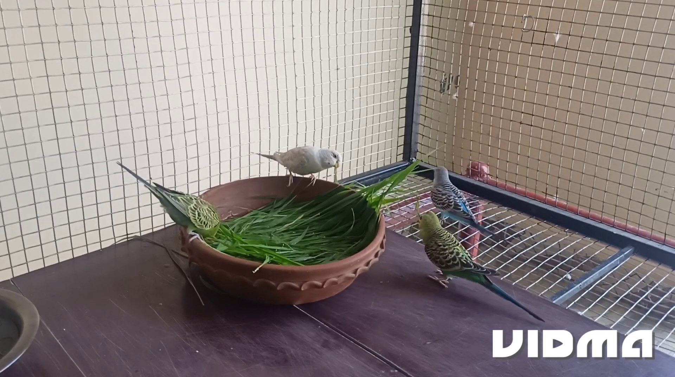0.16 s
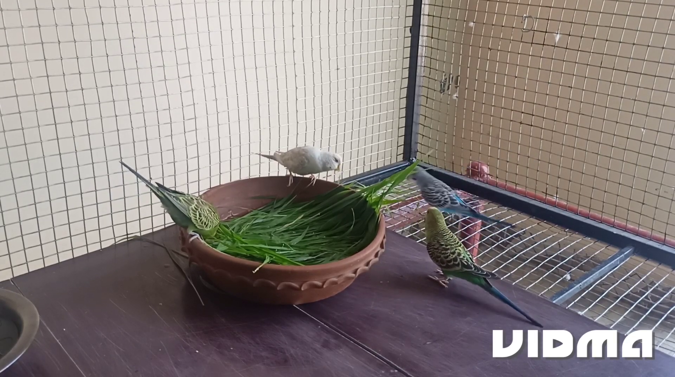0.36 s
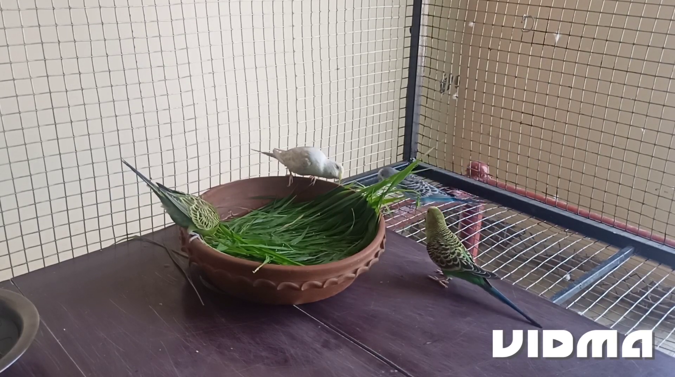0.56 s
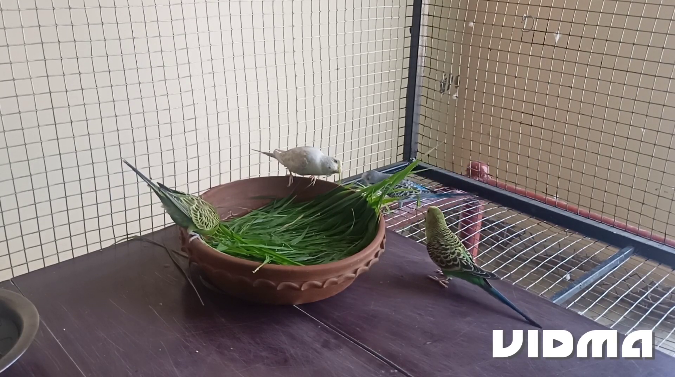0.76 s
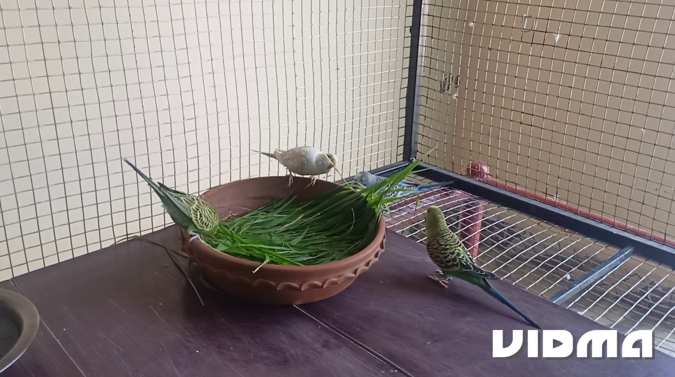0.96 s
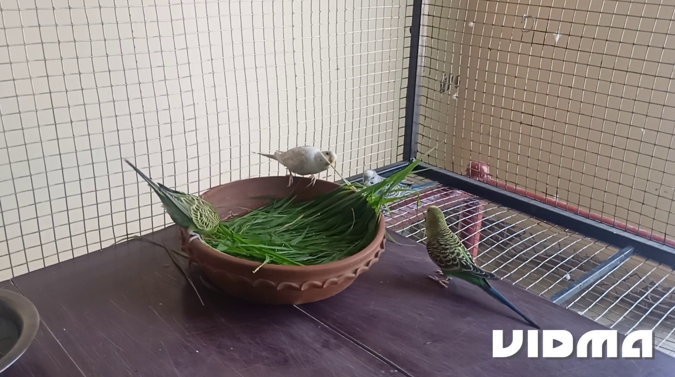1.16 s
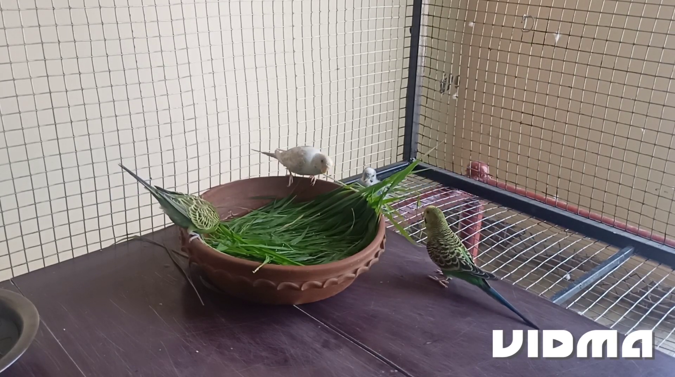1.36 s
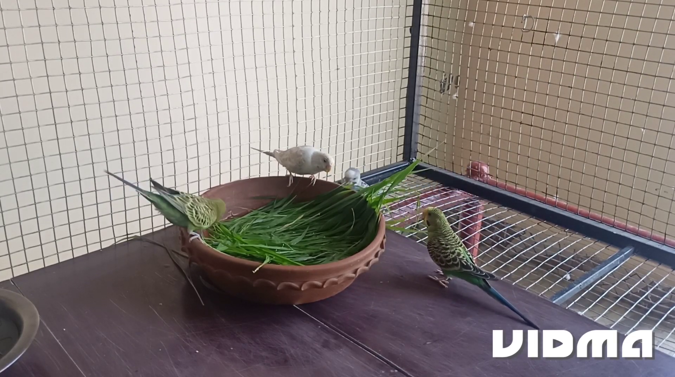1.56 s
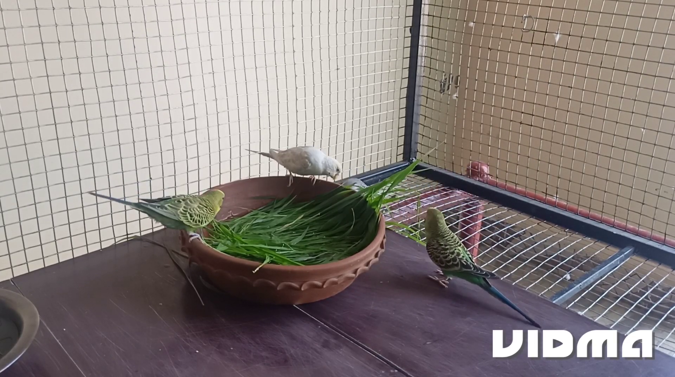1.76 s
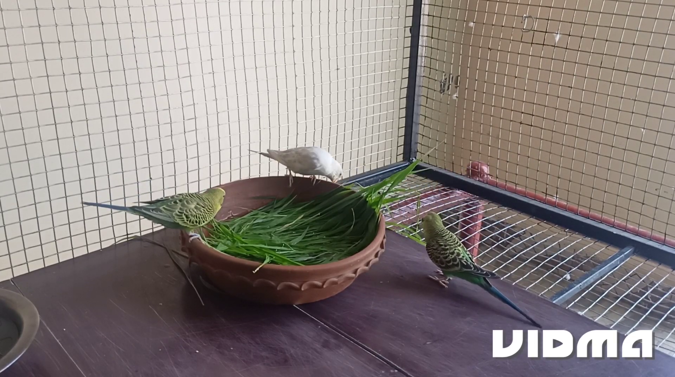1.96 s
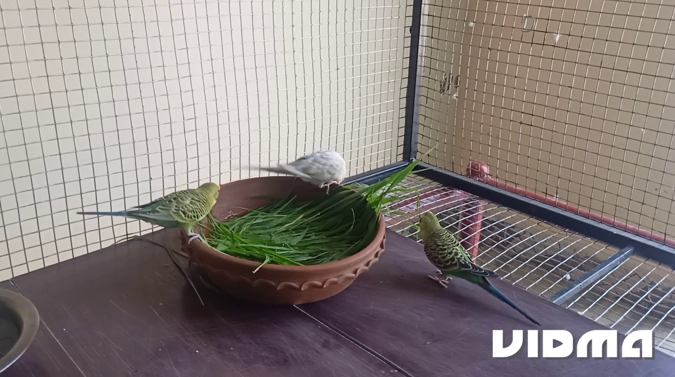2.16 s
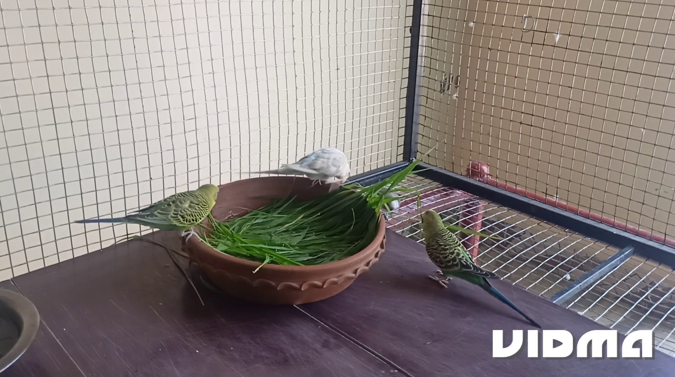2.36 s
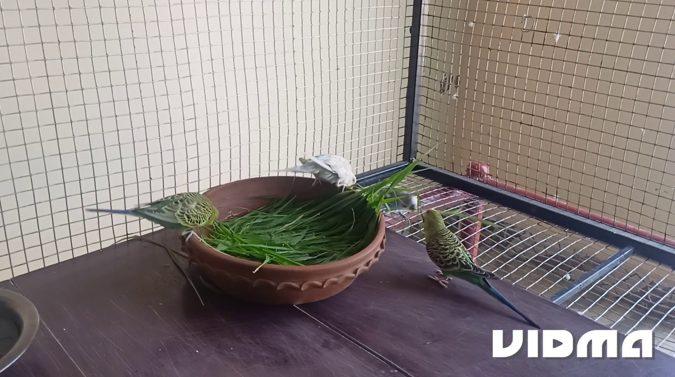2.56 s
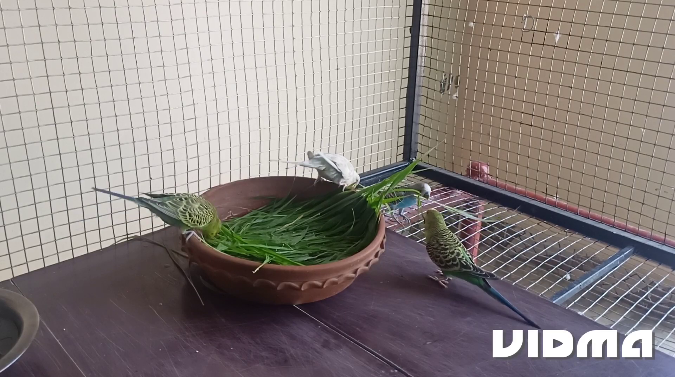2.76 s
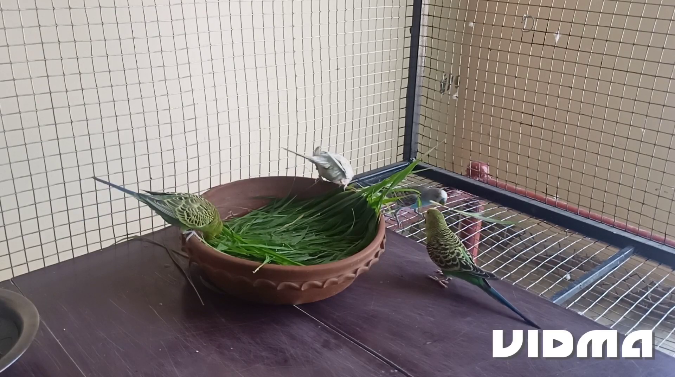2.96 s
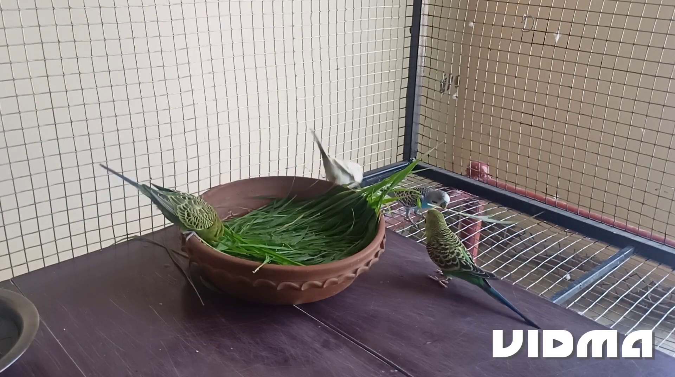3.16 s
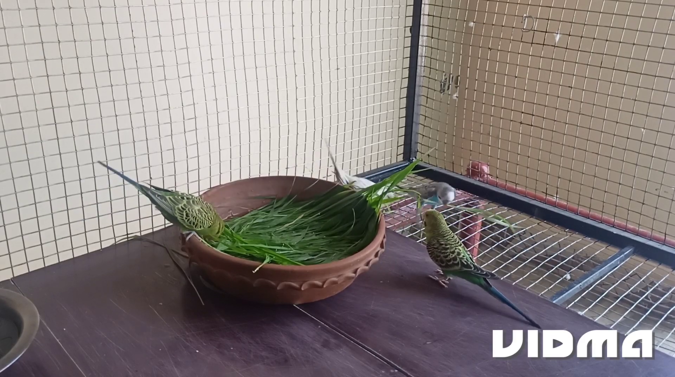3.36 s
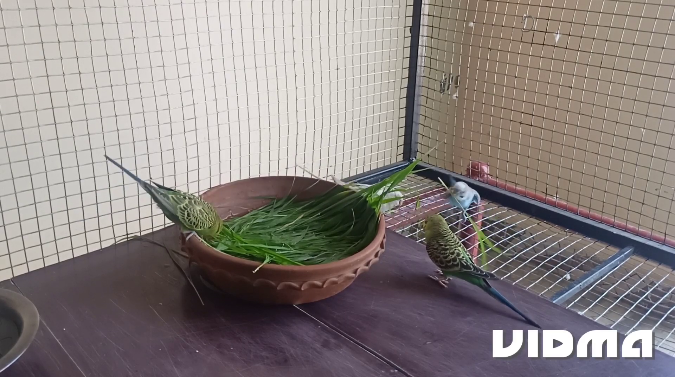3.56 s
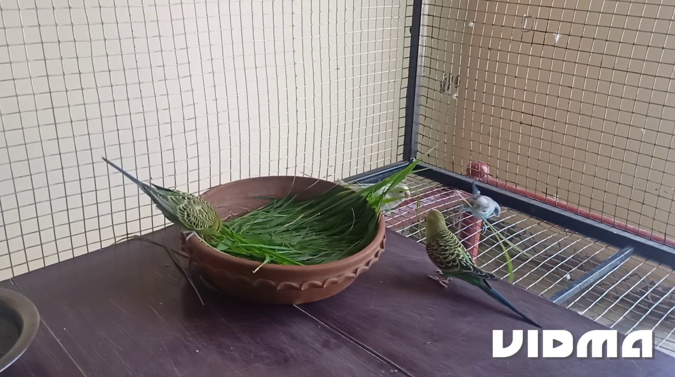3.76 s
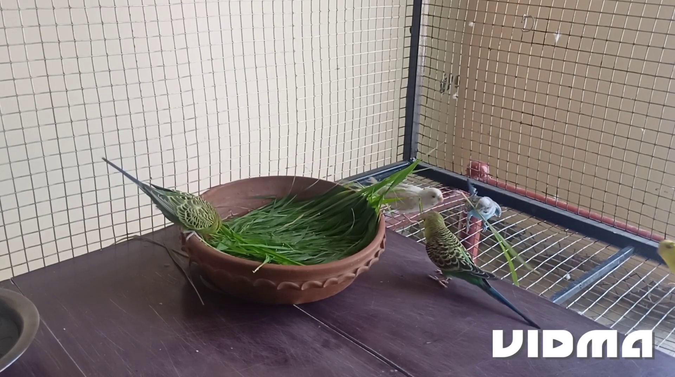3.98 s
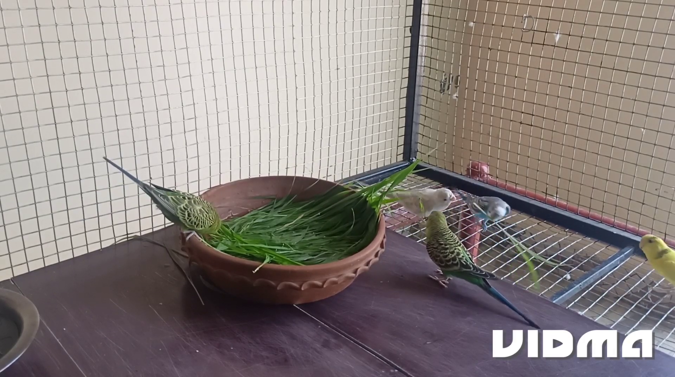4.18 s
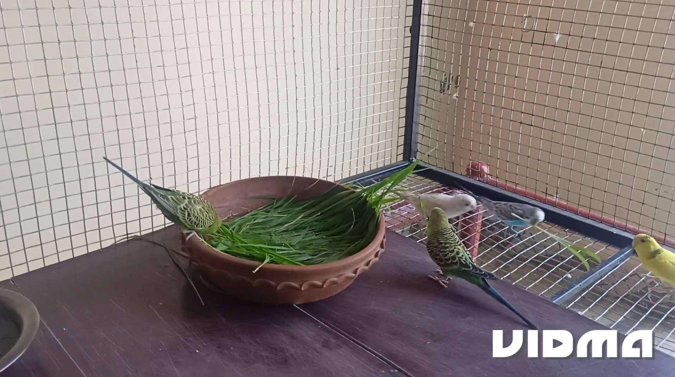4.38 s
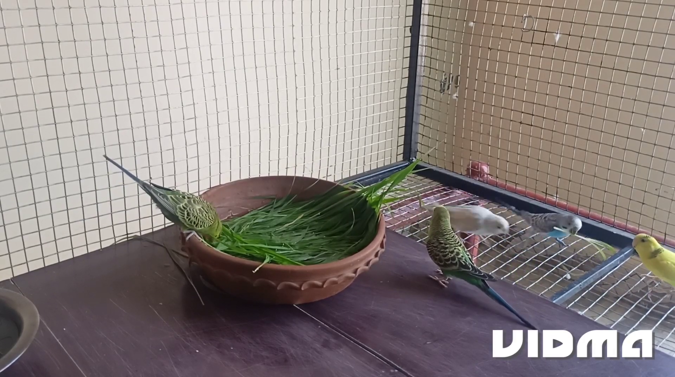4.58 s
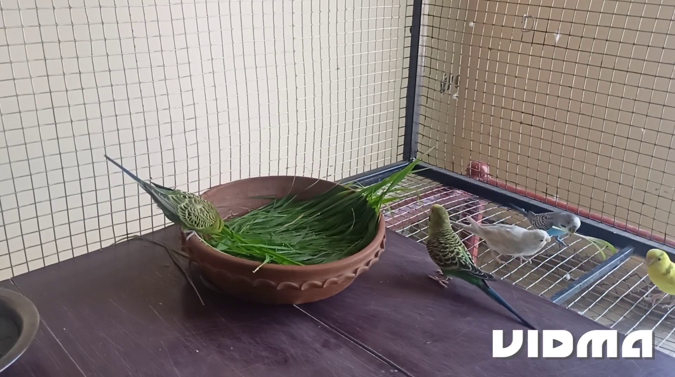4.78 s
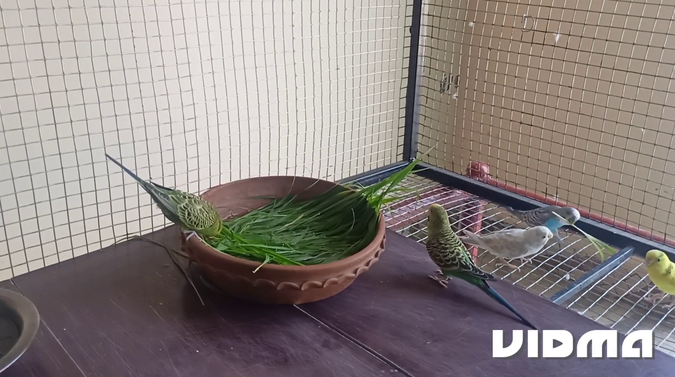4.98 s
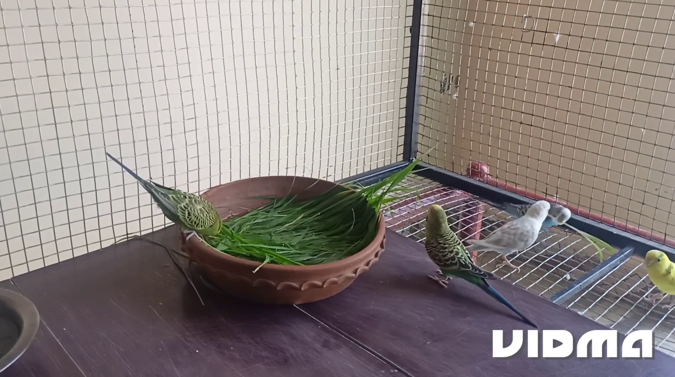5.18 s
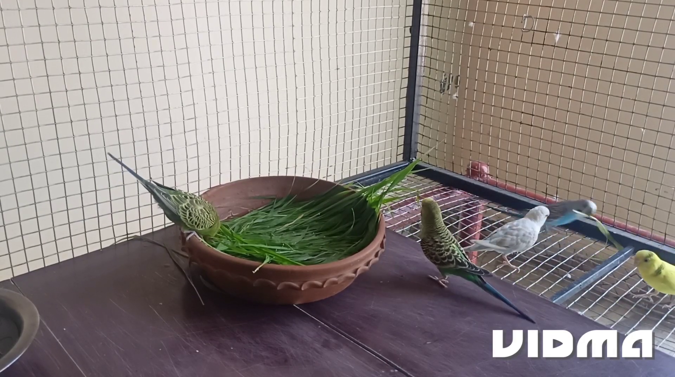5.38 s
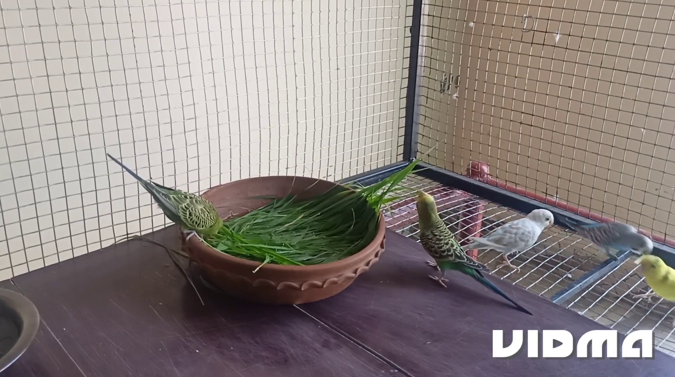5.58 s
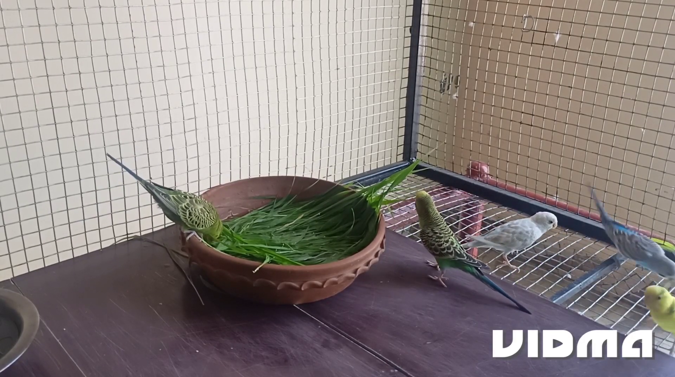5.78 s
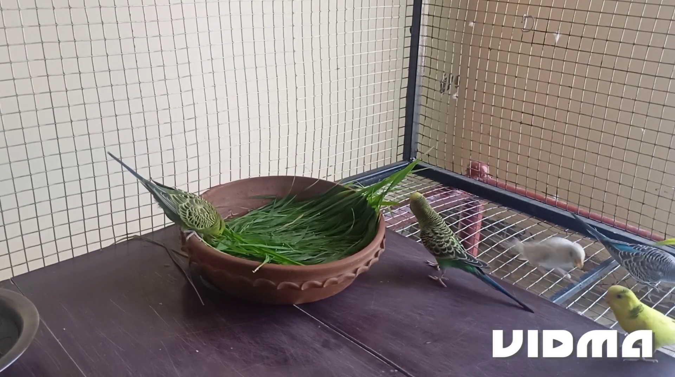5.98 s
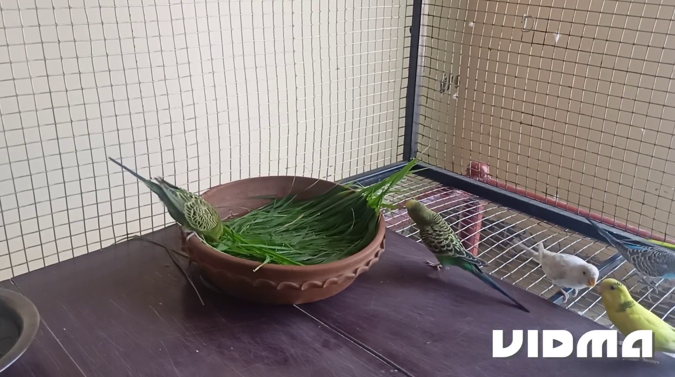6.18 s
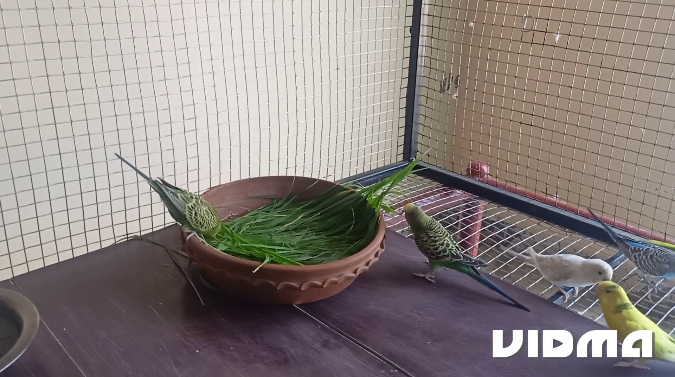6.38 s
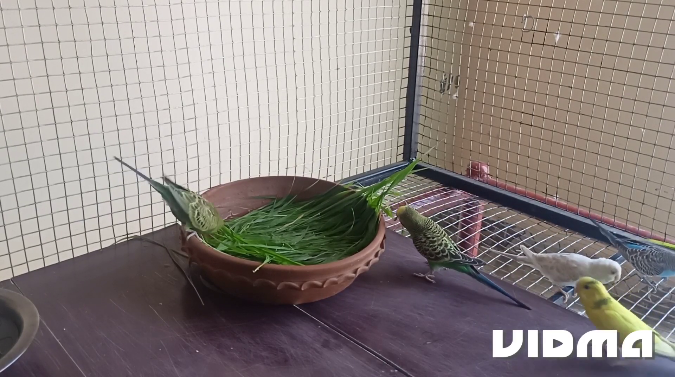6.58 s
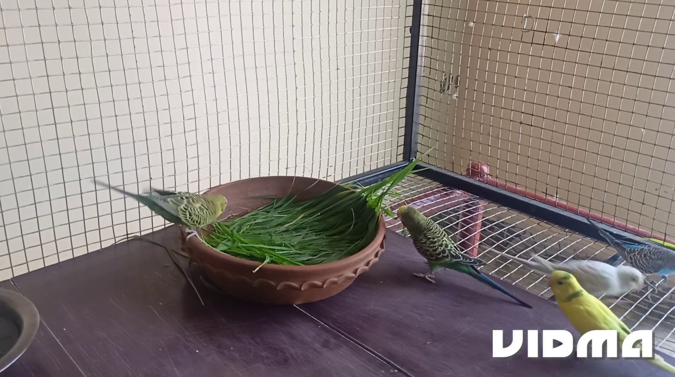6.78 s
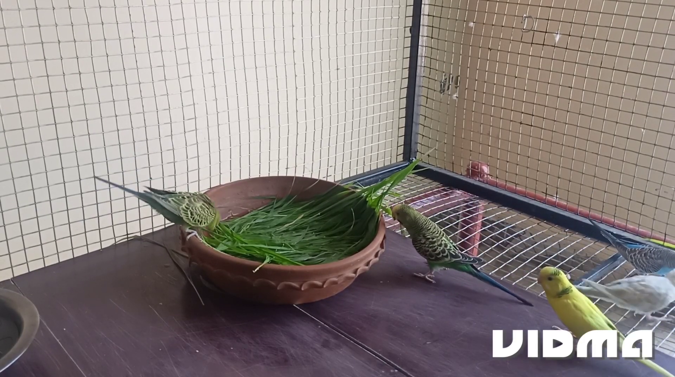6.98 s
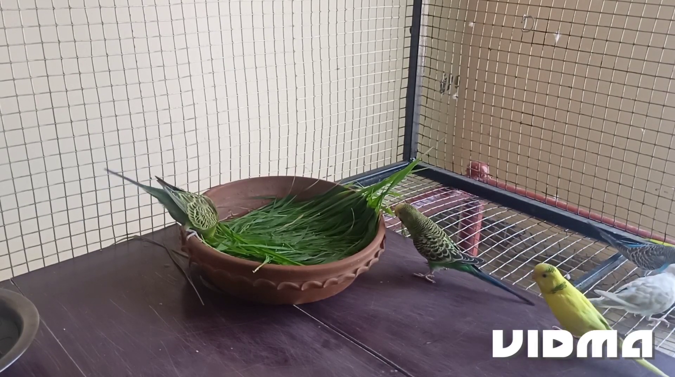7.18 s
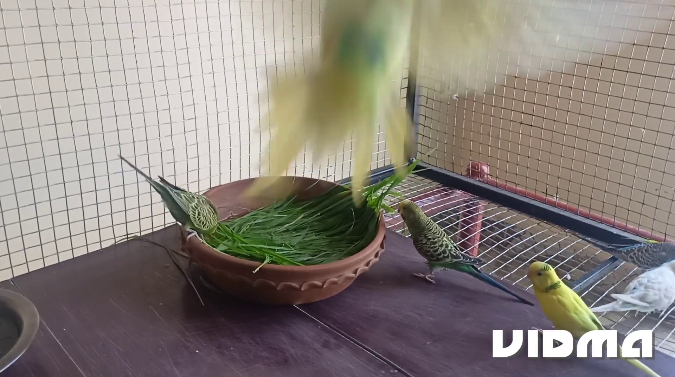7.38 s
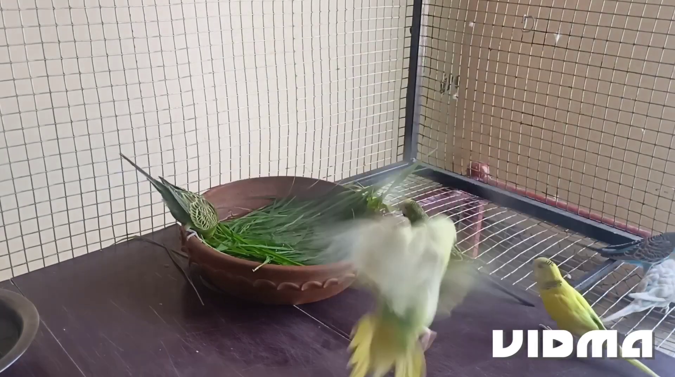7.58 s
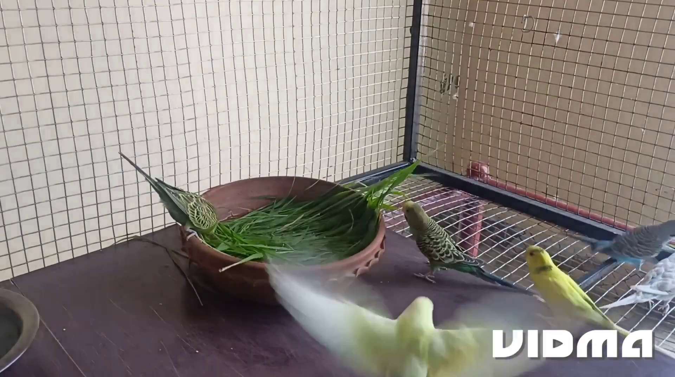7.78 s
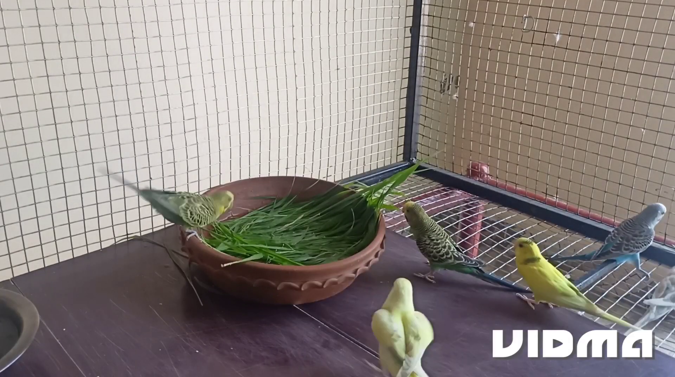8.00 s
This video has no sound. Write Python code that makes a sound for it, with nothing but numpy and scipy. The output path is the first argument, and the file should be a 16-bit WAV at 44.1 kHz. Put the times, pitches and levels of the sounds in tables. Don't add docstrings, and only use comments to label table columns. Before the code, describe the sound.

Inside a wire aviary, small parakeets feed and hop quietly: dry beak snaps, light claw ticks, rustling grass and faint wire pings over a low outdoor hum and thin distant birdsong. Near the end one bird gives a short hoarse falling chirp with a broken upturn, then another flies in close, its rapid wingbeats hooting and swishing, air thumping the microphone.

```python
import sys
import numpy as np
from scipy import signal
from scipy.fft import rfft, irfft
from scipy.io import wavfile
from scipy.ndimage import uniform_filter1d

SR = 44100
rng = np.random.default_rng(int(sys.argv[2]) if len(sys.argv) > 2 else 0)


def pcm_store(signal):
    levels = np.round(np.clip(np.atleast_2d(signal), -1, 1) * 32767)
    wavfile.write(sys.argv[1], SR, levels.astype(np.int16).T)


def volts(x):
    e = np.asarray(x, float) / 20
    return 10 ** e


N = 354608
EDGE_HZ = 15550


def evened(x):
    return x / np.sqrt(np.mean(x ** 2) + 1e-20)


def read(points, hz):
    f, value = np.transpose(points)
    return np.interp(np.log(hz + 1), np.log(f + 1), value, left=value[0], right=value[-1])


def levels(table):
    s, *columns = np.transpose(table)
    t = np.arange(N) / SR
    fade_in = np.clip((t - s[0]) * 40 + 1, 0, 1)
    fade_out = np.clip((s[-1] - t) * 30 + 1, 0, 1)
    return [volts(np.interp(t, s, c)) * fade_in * fade_out for c in columns]


def add(mix, s, sound):
    part = mix[max(round(s * SR), 0):][:len(sound)]
    part += sound[:len(part)]


def resonate(x, hz, width_hz):
    turn = np.exp(2j * np.pi * hz * np.arange(len(x)) / SR)
    r = np.exp(-np.pi * width_hz / SR)
    base = signal.lfilter([(1 - r) ** 2], [1, -2 * r, r * r], x / turn)
    return 2 * (turn * base).real


def noise(colour, size, patchy_db, flicker_db):
    hop, hz = size // 4, np.fft.rfftfreq(size, 1 / SR)
    a, b, patches = rng.standard_normal((N // hop + 5, len(hz), 3)).T
    flicker = evened(uniform_filter1d(patches[1], size=3))
    patches = uniform_filter1d(uniform_filter1d(patches, size=8, axis=0), size=10, axis=1)
    gain_db = read(colour, hz)[:, None] + patchy_db * evened(patches) + flicker_db * flicker
    z = (a + 1j * b) * volts(gain_db)
    return evened(signal.istft(z, nperseg=size, noverlap=size - hop)[1][:N])


# (time [s], hoot level [dB], hoot pitch [Hz], hoot width [Hz])
WING_BEATS = [(7.175, -47.5, 490, 44), (7.236, -42.5, 446.5, 44.3), (7.298, -41.5, 460, 44),
              (7.359, -40.5, 454, 44), (7.412, -40.5, 451, 44), (7.472, -44, 474, 50),
              (7.512, -42, 560, 150), (7.534, -40.5, 425, 120), (7.565, -43.5, 520, 150),
              (7.625, -41, 520, 130), (7.657, -40, 442, 70), (7.686, -46, 388, 90), (7.74, -42.5, 570, 140),
              (7.794, -40, 512, 90), (7.825, -42.5, 451, 60), (7.849, -45, 470, 90),
              (7.895, -42.5, 440, 60), (7.939, -46.5, 424, 70), (7.97, -53, 505, 90), (8.028, -55, 433, 80)]
# (time [s], feather hiss [dB], churned air [dB], buffet [dB])
FLURRY_LEVELS = [
    (7.1, -68, -90, -88),
    (7.204, -54, -63, -54),
    (7.39, -47, -51.5, -45.5),
    (7.518, -49, -59, -27.5),
    (7.656, -45, -47.5, -50.5),
    (7.994, -47, -54, -45),
    (8.04, -54.5, -61, -63),
]
# (middle [s], length [s], level [dB])
FEATHER_SWISHES = [(7.176, .02, -57), (7.232, 0.027, -43.5), (7.292, .022, -46.5), (7.35, 0.028, -46.5),
                   (7.396, .01, -51), (7.409, 0.016, -43.5), (7.467, 0.022, -50), (7.513, .018, -50),
                   (7.532, 0.021, -50), (7.57, 0.008, -59), (7.575, 0.0086, -52), (7.593, 0.014, -50),
                   (7.659, 0.013, -67), (7.684, 0.0095, -51), (7.697, .014, -50), (7.74, 0.011, -59),
                   (7.803, 0.016, -49), (7.816, 0.013, -51), (7.838, 0.019, -56), (7.951, 0.029, -48)]
# (frequency [Hz], density [dB/Hz])
FEATHER_COLOUR = [(410, -23), (700, -2.5), (1090, -7.5), (1200, -10), (1660, -10), (2370, -13.5),
                  (3990, -10.5), (6480, -13), (7990, -9.5), (10700, -19.5), (15000, -15.5), (16000, -3)]
# (frequency [Hz], density [dB/Hz])
CHURN_COLOUR = [(150, -27), (280, -19), (450, 0.5), (620, -7.5), (900, -22.5), (1500, -22.5), (3000, -46)]
STROKE_S = .018


def wings():
    hiss, churn, buffet = levels(FLURRY_LEVELS)
    hoots = np.zeros(N)
    for s, db, hz, width_hz in WING_BEATS:
        breath = resonate(rng.standard_normal(6000), hz, width_hz)[-round(2 * STROKE_S * SR):]
        stroke = np.hanning(len(breath))
        add(hoots, s - STROKE_S, volts(db - 4) * evened(stroke * breath))
    for s, length_s, db in FEATHER_SWISHES:
        add(hiss, s - .6 * length_s, volts(db) * np.hanning(round(1.2 * length_s * SR)))
    swish = hiss * noise(FEATHER_COLOUR, size=256, patchy_db=2.5, flicker_db=2.5)
    churned = churn * volts(2.0) * noise(CHURN_COLOUR, size=512, patchy_db=-0.5, flicker_db=-0.5)
    return swish + hoots + churned, buffet


# (frequency [Hz], density [dB/Hz])
BUFFET_COLOUR = [(12, -52.5), (20, -21), (56, -16.5), (135, -3.5), (170, -11), (206, -2.5), (232, -10),
                 (265, -9), (321, -18.5), (500, -24), (650, -42), (1100, -120)]
# (time [s], peak [dB], frequency [Hz], length [cycles])
EDDY_HITS = [(7.185, -40.5, 89, 0.86), (7.252, -48, 88, 1.4), (7.281, -35.5, 97, 1.3),
             (7.341, -26, 109, 0.63), (7.406, -22.5, 84, 1.26), (7.419, -21, 111, 1.8),
             (7.435, -33, 90, 1.2), (7.459, -22, 81.4, 2.2), (7.479, -15.5, 119, 1.1),
             (7.505, -12, 156, 0.99), (7.519, -17, 161, 0.75), (7.533, -18.5, 126, 2.2),
             (7.549, -15, 173, 0.53), (7.565, -18, 142, 1.1), (7.595, -25, 115, 2.1),
             (7.507, -34, 480, 0.98), (7.622, -29, 550, 1.4), (7.664, -39, 101, 3.7),
             (7.707, -35, 106, 3.5), (7.722, -30.5, 97, 1), (7.786, -39, 110, 1.4)]


def downwash(level):
    out = level * volts(0.5) * noise(BUFFET_COLOUR, size=1024, patchy_db=2.5, flicker_db=0.75)
    u = np.arange(-1500, 1500) / SR
    for s, db, hz, cycles in EDDY_HITS:
        bell = np.exp(-(2 * hz * u / cycles) ** 2)
        add(out, s + u[0], -volts(db) * np.cos(2 * np.pi * hz * u) * bell)
    return out


# (pitch [Hz], octave level [dB])
BEAK_OCTAVE = [(1500, 6), (1900, -3), (2300, -11), (2600, -7), (3100, -18), (4200, -13)]
# (frequency [Hz], level [dB])
RASP_PARTIALS = [(4000, -10), (6000, -20), (8000, -23), (9500, -26), (11500, -31), (12800, -38),
                 (14200, -26), (15500, -25)]
# (delay [s], level [dB])
CHIRP_SLAPS = [(.0045, -12), (.0085, -9), (.014, -13)]
# (frequency [Hz], gain [dB])
CHIRP_COLOUR = [(1000, -18), (1300, 2), (2200, -1), (4000, 1.5), (8300, 0), (9500, -8), (12800, -10),
                (14200, 2)]
HOARSE_S, HOARSE = .05, .6
HALF_DB = -10


def squawk(curve, rough, beak_db, tremble_db, clear):
    s, hz, db = np.transpose(curve)
    t, out = np.arange(s[0], s[-1], 1 / SR), np.zeros(N)
    shake = uniform_filter1d(rng.standard_normal((3, SR)), size=30)
    wobble = evened(uniform_filter1d(shake[:2], size=30))[:, :len(t)]
    grit = evened(shake[2])[:len(t)]
    hoarse = HOARSE * np.clip((t - s[0]) / HOARSE_S, 0, 1) ** 2
    pitch = np.interp(t, s, hz)
    turn = 2 * np.pi * np.cumsum(pitch * (1 + rough * wobble[0])) / SR
    octave = volts(read(BEAK_OCTAVE, pitch) + beak_db) * np.sin(2 * turn)
    octave *= 1 + (1 - clear) * hoarse * (grit - .5)
    upper = sum(volts(read(RASP_PARTIALS, k * pitch)) * np.sin(k * turn) * (k * pitch < EDGE_HZ)
                for k in range(3, 9))
    tone = np.sin(turn) + octave + upper * (1 - hoarse + hoarse * grit)
    tone += volts(HALF_DB) * hoarse * grit[::-1] * np.sin(1.5 * turn)
    level = volts(np.interp(t, s, db) + tremble_db * wobble[1])
    voice = level * tone * signal.windows.tukey(len(t), .06)
    for delay_s, slap_db in [(0, 0)] + CHIRP_SLAPS:
        add(out, s[0] + delay_s, volts(slap_db) * voice)
    return irfft(rfft(out) * volts(read(CHIRP_COLOUR, np.fft.rfftfreq(N, 1 / SR))), N)


# (time [s], pitch [Hz], level [dB])
CHIRP_FALL = [(6.735, 2700, -48), (6.742, 3050, -39), (6.7492, 4150, -40), (6.751, 3350, -37),
              (6.773, 2480, -41), (6.788, 2370, -43), (6.8, 2300, -37), (6.8115, 2170, -40),
              (6.815, 1600, -46), (6.822, 1420, -48), (6.828, 1470, -45), (6.832, 1500, -53)]
# (time [s], pitch [Hz], level [dB])
CHIRP_RISE = [
    (6.833, 1840, -46),
    (6.85, 1970, -43),
    (6.855, 2030, -46),
    (6.858, 2900, -45),
    (6.859, 1980, -44),
    (6.863, 1720, -47),
    (6.866, 1880, -45),
    (6.873, 2000, -38),
    (6.8755, 2480, -39),
    (6.88, 2850, -45),
]


def near_chirp():
    fall = squawk(CHIRP_FALL, rough=.013, beak_db=-1, tremble_db=2, clear=0)
    return fall + squawk(CHIRP_RISE, rough=.008, beak_db=5.5, tremble_db=1.5, clear=.7)


# (frequency [Hz], width [Hz])
TICK_RINGS = [(4200, 2800), (7800, 3800), (13800, 7700)]
# (delay [s], level [dB])
FIRST_WALLS = [(.0037, -6.5), (.007, -16), (.0096, -35), (0.015, -25)]
WIRY_DB = 3.5


def ticks(rows, rattle_db):
    out, t = np.zeros(N), np.arange(5120) / SR
    for s, db, low_db, top_db in rows:
        shake = rng.standard_normal(len(t))
        snap = (np.sign(shake) + .5 * shake) * np.exp(-t / .00025)
        snap = 3.3 * snap / np.linalg.norm(snap)
        wiry = evened(uniform_filter1d(rng.standard_normal(len(t) // 2 + 1), size=30))
        shake = evened(irfft(rfft(shake) * volts(WIRY_DB * wiry)))
        swell = np.exp(-t / 0.034) * (1 - np.exp(-t / 0.00019))
        drive = snap + volts(rattle_db - 9.0) * shake * swell
        for delay_s, wall_db in FIRST_WALLS:
            add(drive, delay_s, volts(wall_db) * snap)
        rings = (volts(ring_db) * resonate(drive, *ring)
                 for ring_db, ring in zip((low_db, 0, top_db), TICK_RINGS))
        add(out, s + 0.0009, volts(db + 5.5) * sum(rings))
    return out


# (time [s], peak [dB], low ring [dB], brightness [dB])
BEAK_SNAPS = [(0.4638, -61.5, -12, 8), (0.6097, -37, -11, -8), (0.714, -37.5, -5, -10),
              (0.8316, -36.5, -19.5, -9), (1.3324, -48, -9, -17), (3.91, -49, -18, -16),
              (3.9684, -66.5, -12, 21), (4.0031, -55, -18, 19), (4.0206, -55, -14, 17.5),
              (4.0588, -46.5, -19, 1), (4.0714, -64, -14, 5), (4.1144, -60, -12, -5),
              (4.9672, -37, -13, -8.5), (6.0124, -54.5, -23, 5.5), (6.6757, -65, -10, 3),
              (7.0772, -40.5, -6.5, -3), (7.162, -47.5, -22, 13), (7.314, -30, -1.5, 0),
              (7.5065, -43, -2, -4), (7.624, -39, -15, -5), (7.6323, -32, -18, -6), (7.783, -32, -2, 2),
              (7.9314, -36, -8, 3), (7.935, -35, -19, 0)]
# (time [s], peak [dB], low ring [dB], brightness [dB])
CLAW_STEPS = [(0.9256, -51, 7, -8), (1.044, -53, 4, -2), (1.146, -55, 7, 0.5), (1.2298, -61.5, 1, 8),
              (1.498, -58, 1, -14), (1.6418, -55, 7, -6), (1.6924, -62, -8, 7), (2.643, -55, 6, -4),
              (2.7498, -52.5, 3, 0.5), (2.837, -49, -0.5, -13), (2.9434, -58.5, -1, -6),
              (3.1684, -52, 0, 3.5), (3.619, -51, -8, -1), (4.763, -55, 8, -6), (4.9668, -57, 1, -14),
              (0.831, -45, -1, 0), (7.215, -50, -3, -4), (7.4558, -44, 6, 0), (7.7521, -32, -2, -5),
              (7.8736, -39, 6, -1)]
# (time [s], peak [dB], brightness [dB])
FOOT_SCUFFS = [(0.037, -68, 14.5), (0.116, -74, 13), (0.368, -65, 9), (1.412, -67.5, 7), (1.746, -57, 2),
               (1.937, -53.5, 1), (2.209, -73, 19), (3.3554, -57.5, 3), (3.526, -56.5, 3),
               (3.6813, -58.5, 1), (3.733, -49.5, -3.5), (3.853, -56.5, -2), (0.15, -68.5, 10.5),
               (5.99, -73.5, 13.5), (4.041, -71, 6), (4.186, -60.5, 4), (4.4714, -69, 4), (4.628, -70, 1),
               (4.763, -56, -1), (5.099, -70, 5), (5.1875, -68.5, 10.5), (5.65, -59, -1), (5.943, -80, 22),
               (6.091, -59.5, 6.5), (6.381, -64, -15)]
RATTLE_LEVELS = [-20, -15.5, -0.5]
SCUFF_LOW_DB = -7.5


def beaks_and_feet():
    scuffs = [(s, db, SCUFF_LOW_DB, top_db) for s, db, top_db in FOOT_SCUFFS]
    return sum(map(ticks, (BEAK_SNAPS, CLAW_STEPS, scuffs), RATTLE_LEVELS))


# (time [s], length [s], level [dB], frequency [Hz])
BRUSH_PUFFS = [(0.732, 0.012, -64, 13500), (.879, .02, -68, 4600), (.978, 0.018, -71, 11000),
               (1.027, 0.036, -70, 14000), (1.027, 0.051, -72.5, 7200), (1.128, 0.036, -69, 14000),
               (1.675, 0.0044, -68, 7000), (1.772, .025, -70, 8900), (1.808, .006, -73, 13500),
               (2.585, .03, -75, 14000), (2.586, .02, -74, 8450), (2.885, 0.042, -72, 14100),
               (2.992, 0.013, -79, 7200), (3.116, .015, -79, 9000), (3.42, 0.0054, -65, 13000),
               (3.484, 0.0064, -72, 8000), (3.62, .014, -71, 3710), (3.686, 0.016, -67, 3630),
               (3.79, .03, -71, 14000), (3.873, 0.028, -65, 14000), (4.082, 0.0085, -54.5, 15100),
               (4.028, .12, -81, 2960), (4.09, 0.036, -75, 14800), (6.862, 0.011, -58, 14700),
               (7.956, 0.012, -53, 11000), (8.019, 0.022, -52, 13600)]


def brushes():
    out = np.zeros(N)
    for s, length_s, db, hz in BRUSH_PUFFS:
        puff = resonate(rng.standard_normal(4000), hz, 0.47 * hz)
        puff = evened(puff)[:round(length_s * SR)]
        add(out, s, volts(db) * puff * signal.windows.tukey(len(puff), .4))
    return out


# (time [s], peak [dB], frequency [Hz], t60 [s])
BOARD_KNOCKS = [
    (3.36, -54.5, 223, 0.86),
    (3.383, -52.5, 286, 0.21),
    (3.41, -56, 168, 0.27),
    (3.685, -52, 124, 0.19),
    (3.738, -45, 94, 0.087),
    (3.745, -53, 220, 0.17),
    (3.74, -51.5, 618, 0.072),
    (3.78, -62, 64.6, 0.71),
    (4.03, -59.5, 62.4, .3),
]


def knocks():
    out, t = np.zeros(N), np.arange(20000) / SR
    for s, db, hz, t60_s in BOARD_KNOCKS:
        onset = 1 - np.exp(-t / 0.0023)
        add(out, s, volts(db - 60 * t / t60_s) * onset * np.sin(2 * np.pi * hz * t))
    return out


# (time [s], then level of each wire ring [dB])
WIRE_PLUCKS = [
    (2.536, -105, -73, -68, -72, -63.5),
    (3.272, -71, -63, -65, -85, -75),
]
# (frequency [Hz], t60 [s])
WIRE_RINGS = [(2250, 0.18), (3300, 0.046), (4600, 0.064), (6000, 0.091), (7480, 0.095)]


def plucks():
    out, t = np.zeros(N), np.arange(12000) / SR
    for s, *rings_db in WIRE_PLUCKS:
        for db, (hz, t60_s) in zip(rings_db, WIRE_RINGS):
            add(out, s, volts(db - 60 * t / t60_s) * np.sin(2 * np.pi * hz * t))
    return out


# (frequency [Hz], t60 [s])
CAGE_T60 = [(200, 0.29), (1000, 0.38), (3000, 0.4), (8000, 0.42), (15000, 0.34)]


def cage(x, slower):
    taps = np.zeros(SR)
    at = np.arange(130, SR - 10, 10)
    taps[at + rng.integers(0, 10, len(at))] = rng.choice([-1., 1.], len(at))
    hz, t, z = signal.stft(taps, SR, nperseg=256)
    decay = volts(-60 * t / (slower * read(CAGE_T60, hz)[:, None]))
    tail = signal.istft(z * decay, SR, nperseg=256)[1]
    return signal.fftconvolve(x, tail / np.linalg.norm(tail))[:N]


def song(notes, rough, taper, tremble_db):
    out = np.zeros(N)
    for s, length_s, from_hz, to_hz, db in notes:
        wobble = evened(uniform_filter1d(rng.standard_normal((2, SR)), size=30))
        wobble = wobble[:, :round(length_s * SR)]
        u = np.linspace(0, 1, wobble.shape[1])
        pitch = (from_hz + (to_hz - from_hz) * u) * (1 + rough * wobble[0])
        turn = 2 * np.pi * np.cumsum(pitch) / SR
        tone = np.sin(turn) + volts(-40) * np.sin(2 * turn) + volts(-57) * np.sin(3 * turn)
        level = volts(db + 5.5 + tremble_db * wobble[1])
        add(out, s, level * tone * signal.windows.tukey(len(u), taper))
    return out


# (time [s], level [dB])
PEEP_PHRASE = [
    (0, 0.051, 6370, 5640, 2),
    (0, .05, 7250, 6860, -18),
]
PEEP_TIMES = [(.07, -75), (0.309, -75.5), (0.529, -74), (.75, -74)]
SWEEP_PHRASE = [
    (0, .065, 3810, 5050, 0.58),
    (.06, 0.027, 5040, 5120, -2.3),
]
SWEEP_TIMES = [(0.911, -73.5), (1.101, -74.5), (1.3, -73.5), (1.494, -74), (1.716, -74.5), (5.301, -83)]
SLIDE_PHRASE = [
    (0.0018, 0.065, 4800, 2900, 0),
]
SLIDE_TIMES = [(1.291, -72.5), (1.639, -70.5), (5.478, -80.5)]
DRONE_PHRASE = [
    (0, 0.19, 2780, 2830, 0),
]
DRONE_TIMES = [(0.901, -82), (1.17, -85), (1.448, -83), (1.63, -82)]
TWEET_PHRASE = [
    (0, .07, 4350, 4950, -3),
    (.068, .03, 4950, 6200, -1),
    (.095, .025, 6200, 6350, 0),
]
TWEET_TIMES = [(5.775, -77.5), (6.016, -75), (6.278, -76)]
# (time [s], length [s], from [Hz], to [Hz], level [dB])
SINGLE_NOTES = [(.01, 0.68, 2930, 2760, -87.5), (1.398, 0.12, 3880, 3670, -79),
                (2.177, 0.12, 3950, 3130, -79), (1.84, 0.031, 2440, 2500, -79),
                (1.95, 0.039, 3300, 3280, -83), (4.267, 0.085, 4870, 3800, -80),
                (8.8, 0.035, 5300, 5800, -75), (4.46, 0.05, 4800, 4750, -83.5),
                (5.29, 0.066, 3030, 2920, -87), (5.645, 0.035, 5470, 5500, -77),
                (5.9, 0.036, 3050, 2900, -84), (5.79, 0.067, 4700, 5700, -75.5),
                (5.53, 0.07, 5400, 5600, -83), (6.529, 0.072, 4290, 5200, -78)]


def far_birds():
    birds = [(PEEP_PHRASE, PEEP_TIMES), (SWEEP_PHRASE, SWEEP_TIMES), (SLIDE_PHRASE, SLIDE_TIMES),
             (DRONE_PHRASE, DRONE_TIMES), (TWEET_PHRASE, TWEET_TIMES)]
    sung = [(s + delay_s, *glide, db + part_db)
            for phrase, times in birds
            for s, db in times
            for delay_s, *glide, part_db in phrase]
    return song(sung + SINGLE_NOTES, rough=.017, taper=.4, tremble_db=3)


# (time [s], outdoor hum [dB], restlessness of the birds [dB])
AIR_LEVELS = [(0.0, -65.5, 2.5), (0.13, -64, 2.5), (0.5, -65.5, 2.5), (0.73, -65, 6.5), (1.14, -64.5, 5.5),
              (1.42, -65, -9), (1.72, -63.5, 2.5), (2.0, -65.5, -6), (2.24, -67, 3.5), (3.23, -67, -2.5),
              (3.45, -64, 6.5), (4.05, -61.5, 2.5), (4.37, -65, -0.5), (4.52, -67.5, -5.5), (4.81, -67, 0),
              (5.8, -67.5, -1), (6.06, -66.5, 1), (6.4, -67, -3)]
# (time [s], outdoor hum [dB], restlessness [dB])
GATE_OPEN = [
    (6.72, -66.5, -2),
    (6.745, -59.5, -3),
    (6.79, -56.5, -1),
    (6.86, -53, 3),
    (6.9, -52.5, 3),
    (6.98, -62.5, -1),
    (7.021, -60.5, 10),
    (7.1, -61, 12),
    (8.1, -53, 11),
]
# (frequency [Hz], density [dB/Hz])
HUM_COLOUR = [(12, -42), (20, -18), (32, -35.5), (54, 18), (97, -12), (163, 1.5), (239, -3.5), (276, 1),
              (368, 0.5), (2150, -21), (6000, -28), (7800, -81), (13200, -120)]
# (frequency [Hz], density [dB/Hz])
RUSTLE_COLOUR = [(1500, -67), (2500, -9.5), (4000, -1), (6000, -3), (8500, -2.5), (10000, -7.5),
                 (11500, -10), (13000, -40)]
# (frequency [Hz], density [dB/Hz])
FIZZ_COLOUR = [(9000, -52), (10500, 3), (12000, 5), (15000, 16.5), (16000, 10.5)]
RUSTLE_DB, RUSTLE_FOLLOWS = -80, 0.88
FIZZ_DB, FIZZ_GATE = -80, 0.45


def air():
    s, hum_db, stir_db = np.transpose(AIR_LEVELS + GATE_OPEN)
    rustle_db = RUSTLE_DB + RUSTLE_FOLLOWS * stir_db
    fizz_db = FIZZ_DB + stir_db + FIZZ_GATE * (hum_db - hum_db[0])
    hum, rustle, fizz = levels(np.transpose([s, hum_db, rustle_db, fizz_db]))
    low = hum * volts(-1.0) * noise(HUM_COLOUR, size=1024, patchy_db=0.13, flicker_db=0.5)
    mid = rustle * noise(RUSTLE_COLOUR, size=256, patchy_db=2.2, flicker_db=1.2)
    top = fizz * noise(FIZZ_COLOUR, size=256, patchy_db=2.5, flicker_db=1.6)
    return low + mid + top


def scene():
    flaps, buffet = wings()
    chirp = near_chirp()
    taps = beaks_and_feet() + plucks() + brushes()
    echoes = cage(volts(-4.5) * chirp + volts(-5.5) * taps + volts(-17.0) * flaps, slower=1.0)
    far = far_birds()
    far = volts(-9) * far + volts(-2) * cage(far, slower=1.35)
    near = flaps + downwash(buffet) + volts(1.9) * chirp + taps + knocks()
    return (near + echoes + far + air())[None]


def band_limit(x):
    return signal.sosfilt(signal.butter(12, 16800, fs=SR, output="sos"), x)


def record(dry):
    bass_cut = signal.butter(3, 38, "high", fs=SR, output="sos")
    edge = signal.firwin(255, EDGE_HZ, window=("kaiser", 3), fs=SR)
    mix = signal.oaconvolve(signal.sosfilt(bass_cut, dry), edge[None], "same")
    return band_limit(mix)


dry = scene()
out = record(dry)
pcm_store(out)
```